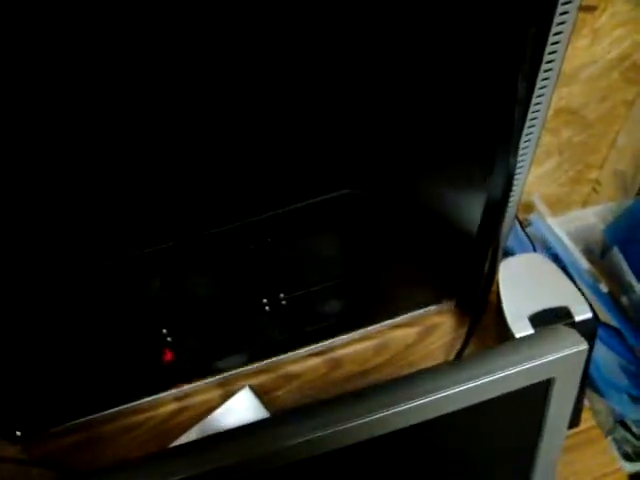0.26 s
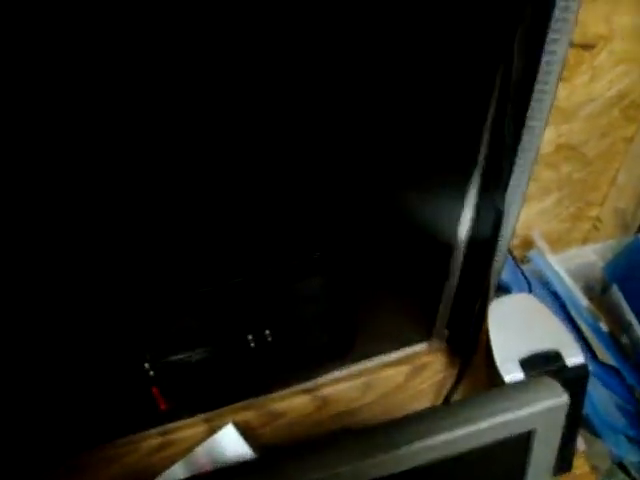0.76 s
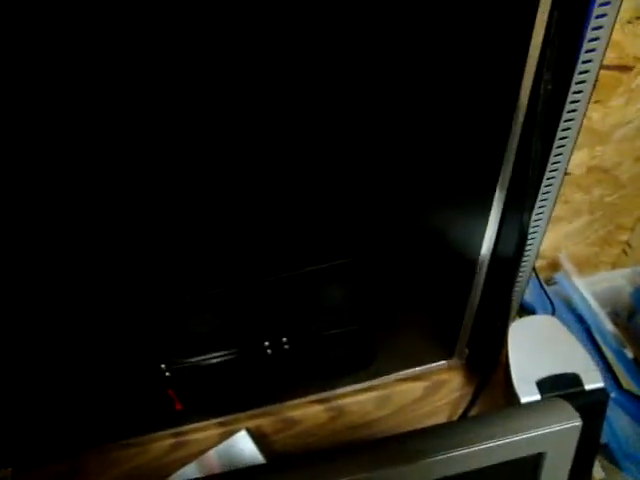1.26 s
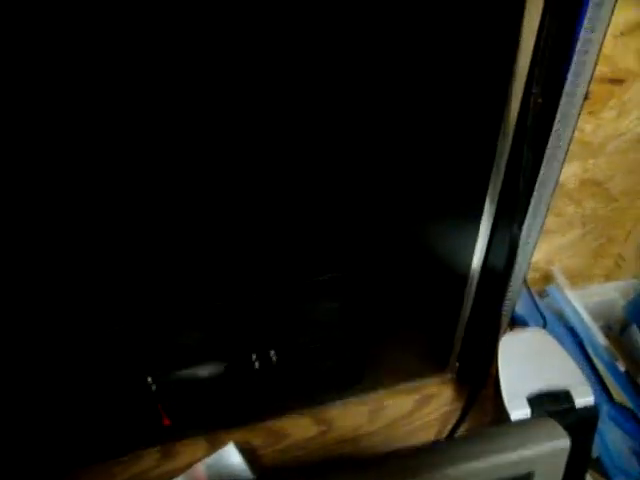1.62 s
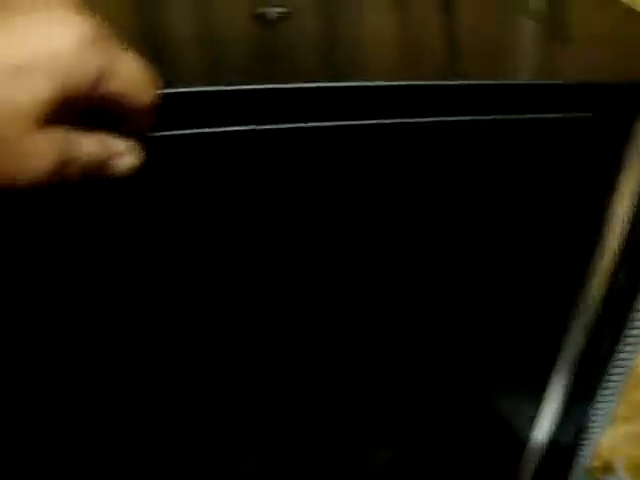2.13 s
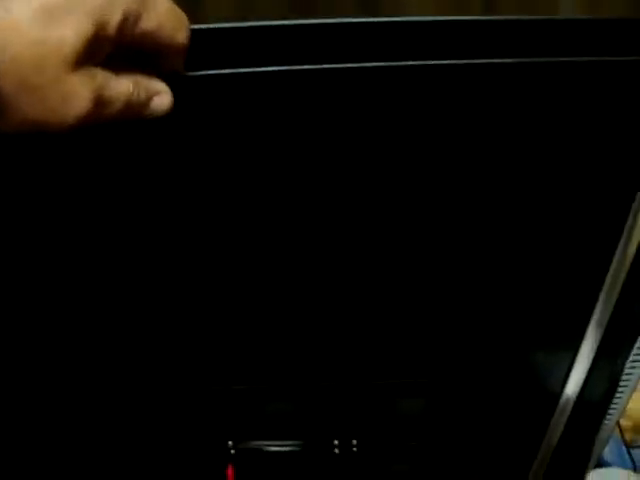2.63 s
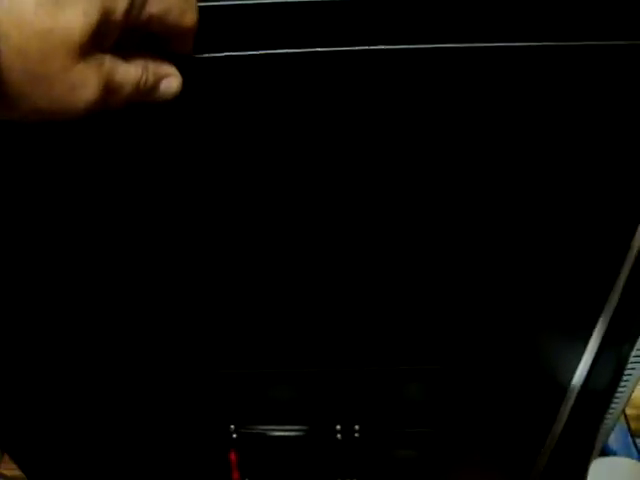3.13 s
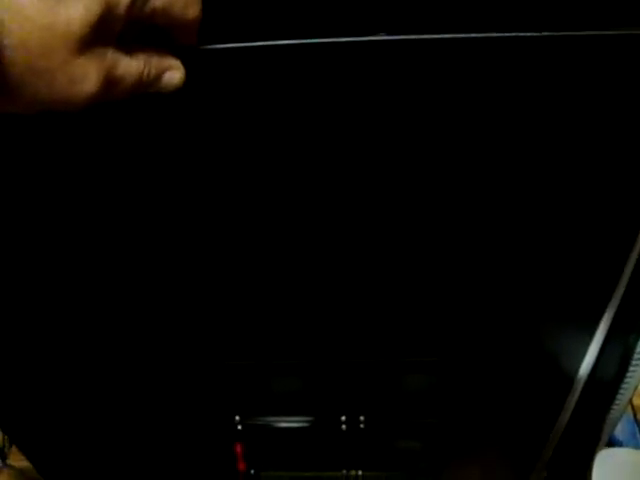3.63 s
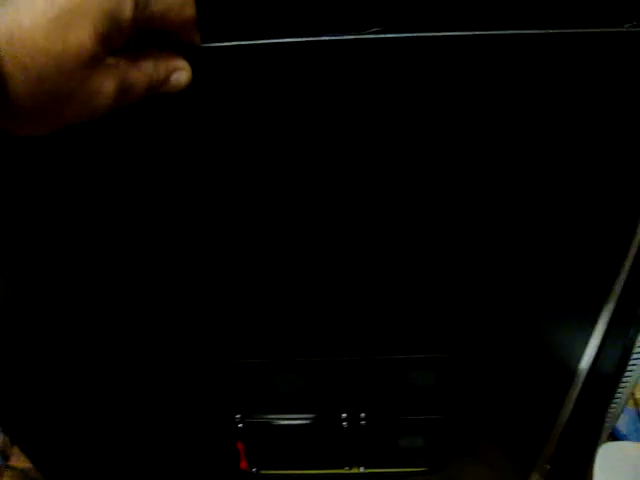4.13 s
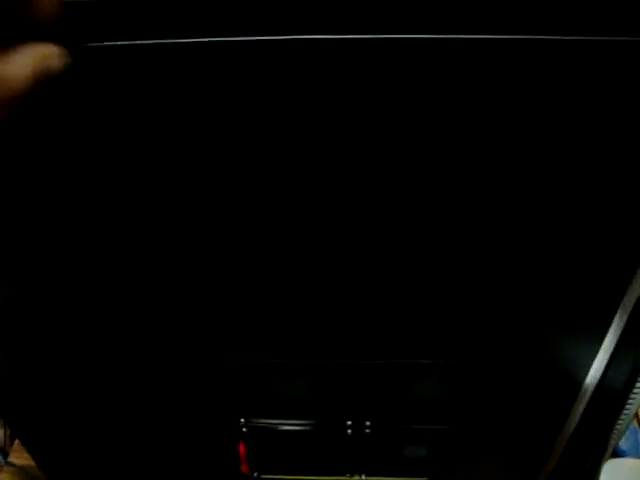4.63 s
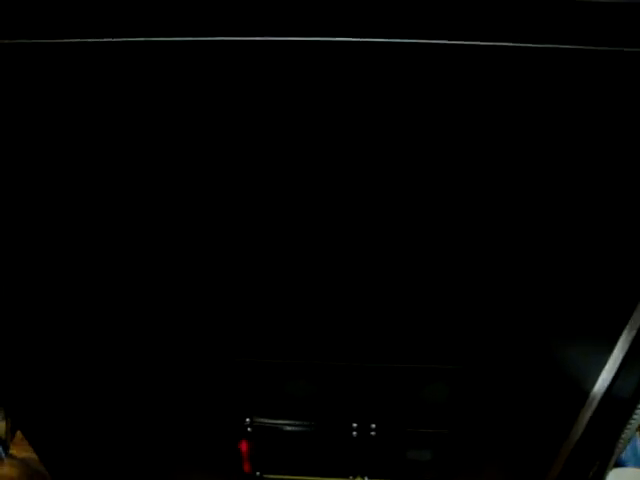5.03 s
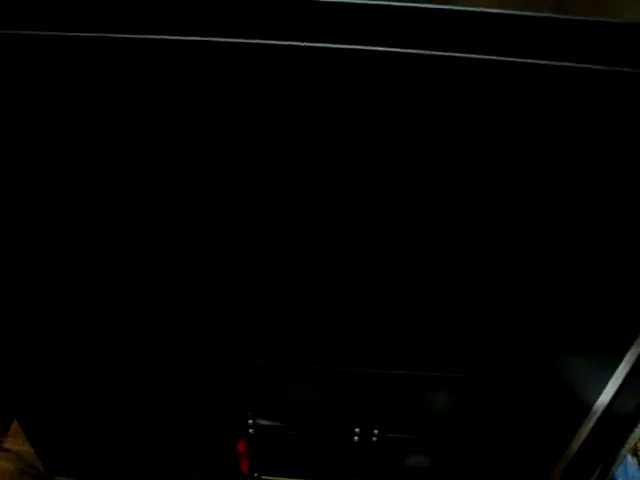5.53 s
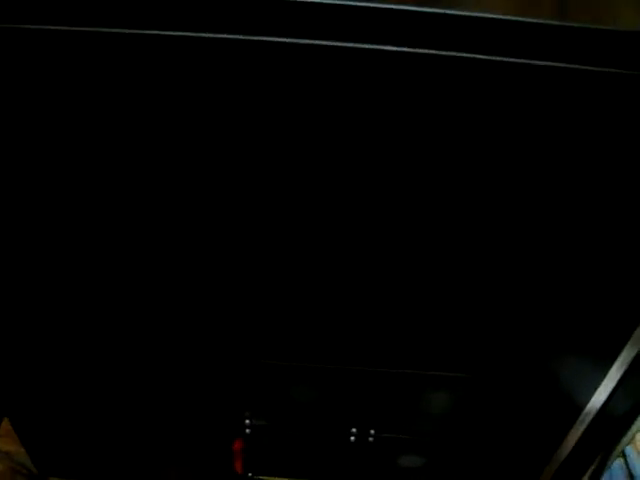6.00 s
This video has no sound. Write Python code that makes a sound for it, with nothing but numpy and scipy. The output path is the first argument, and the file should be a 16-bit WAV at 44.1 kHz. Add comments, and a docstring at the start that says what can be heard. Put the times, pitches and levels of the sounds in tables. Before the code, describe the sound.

Throughout about 6.3 seconds, a desktop computer runs close by: a low, steady pump drone, gently wavering fan tones and a broad rush of air. After a quiet start, a hollow knock and scuff land at 0.7, with lighter taps following. From 1.2 to 1.65 come sharp clacks and small rattling bounces, then a faint scrape at 1.8 and a tap at 2.0. A busy run of scuffs, snaps and clicks fills 2.5 to 3.0. After a pause, a duller, solid knock hits at 3.8, with a softer one at 4.0 and a sliding hiss to 4.4. The loudest crack, at 4.46, breaks into rattles until 4.9. Smaller knocks follow around 5.1; the pump softens and a low panel hum rises. Bright snaps chatter at 5.6 to 5.8, then a hand hisses across the panel to the end. Nearly mono, with flattened peaks.

```python
"""A hand works a case panel into place close by: it knocks, snaps and rattles against the frame. Each contact
sums decaying modes of the panel with shaped noise bursts; edge scuffs and a sliding hand are swelling noise.
Behind them a desktop computer runs: pump harmonics drone, fan tones waver, and noise makes the air rush. The
hardest knocks are flattened; only a faint, late treble differs between left and right."""
import sys
import numpy as np
from scipy import signal
from scipy.fft import rfft, irfft, next_fast_len
from scipy.io import wavfile

SR = 44100
rng = np.random.default_rng(int(sys.argv[2]) if len(sys.argv) > 2 else 0)


def persist_wave(psi):
    """Save psi, clipped to +-1, as 16-bit WAV."""
    counts = np.round(np.clip(psi, -1, 1) * 32767).astype(np.int16)
    wavfile.write(sys.argv[1], SR, np.atleast_2d(counts).T)


N = 276066


def from_db(db):
    """Decibels to gain."""
    return 10 ** (np.asarray(db) / 20)


def rms_one(x):
    """Scale to unit power."""
    return x / np.sqrt(np.mean(x ** 2) + 1e-20)


def noise(spectrum, size=N):
    """Noise of rms 1 with the given colour, silent outside its first and last frequency."""
    hz, db = np.transpose(spectrum)
    padded = next_fast_len(size)
    bins = np.maximum(np.fft.rfftfreq(padded, 1 / SR), 1)
    gain = from_db(np.interp(np.log(bins), np.log(hz), db, left=-90, right=-90))
    white = rng.standard_normal(padded)
    return rms_one(irfft(rfft(white) * gain, padded)[:size])


def drift(rate):
    """Random wander: straight lines between random points of spread 1, rate points a second."""
    knots = rng.standard_normal(2048)
    return np.interp(np.arange(N) / SR * rate, np.arange(len(knots)), knots)


def resonate(x, hz, width_hz):
    """One resonance with gain 1 on top."""
    r = np.exp(-np.pi * width_hz / SR)
    feed = np.array([1, 0, -1]) * (1 - r * r) / 2
    feedback = [1, -2 * r * np.cos(2 * np.pi * hz / SR), r * r]
    return signal.lfilter(feed, feedback, x + 1e-18)


def decay(t, t60):
    """Exponential decay, by 60 dB in t60 seconds."""
    return np.exp(-np.minimum(np.log(1000) * t / max(t60, 1e-3), 40))


def tone(hz, flutter_db):
    """A sine of rms 1 on a pitch curve, before its level flutters at random."""
    phase = 2 * np.pi * (np.cumsum(hz) / SR + rng.random())
    return np.sqrt(2) * np.sin(phase) * from_db(flutter_db * drift(22))


# Air rushing through the grilles close by.
# Each row: frequency in Hz, relative level in dB per Hz.
AIR_COLOUR = [(300, 7.5), (490, -0.5), (590, 2.5), (700, 0.5), (930, 3), (1200, -1), (1800, -1.5),
              (2150, -3), (3200, -4.5), (4600, -7), (5200, -11.5), (7500, -16.5), (10000, -18.5),
              (10800, -63)]
# The same air booming inside the case. Each row: frequency in Hz, relative level in dB per Hz.
CASE_BOOM_COLOUR = [(20, -31), (50, -22.5), (90, -16.5), (140, -15.5), (190, -3.5), (270, 2), (330, -15),
                    (420, -5.5), (480, -17.5), (700, -47)]


def airflow():
    """Air rushes through the grilles, slightly uneven, and booms in the case."""
    turbulence = from_db(0.5 * drift(25))
    rush = from_db(-29.5) * turbulence * noise(AIR_COLOUR)
    boom = from_db(-32.0) * noise(CASE_BOOM_COLOUR)
    return rush + boom


# Fan blade tones in the case.
# Each row: frequency in Hz, level in dB rms before flutter and the panel's shielding.
FAN_BLADE_TONES = [(573, -47), (635, -49), (764.4, -42), (877.5, -52), (1604, -53), (1771, -48.5),
                   (2024, -59), (2573, -48.5)]


def fans():
    """Blade tones whose pitch and level waver in the turbulence."""
    out = np.zeros(N)
    for hz, db in FAN_BLADE_TONES:
        pitch_hz = hz * (1 + 0.00346 * drift(25.04))
        out += from_db(db) * tone(pitch_hz, flutter_db=2.5)
    return out


PUMP_SHAFT_HZ = 59.25
# Cooling pump in the case. Each row: multiple of the shaft speed,
# level in dB rms before flutter, the pump's overall trim and the panel's shielding.
PUMP_HARMONICS = [(2, -49.5), (3, -51.5), (4, -33), (5, -31.5), (6, -36), (7, -43.5)]


def pump():
    """Harmonics of one almost steady shaft."""
    shaft_hz = PUMP_SHAFT_HZ * (1 + 0.0021 * drift(5.6))
    return sum(from_db(db) * tone(k * shaft_hz, flutter_db=1.1) for k, db in PUMP_HARMONICS)


# How firmly the panel sits in its frame. Each row: time in seconds, seating from 0 loose to 1 seated.
SEATING_CURVE = [(0, 0.11), (1.0, 0.1), (2.3, 0.15), (3.3, 0.03), (4.3, 0.19), (4.9, 0.44), (5.35, .95),
                 (6.26, 1)]


def seating(s):
    """How firmly the panel sits at the given times, 0-1."""
    return np.clip(np.interp(s, *np.transpose(SEATING_CURVE)), 0, 1)


def panel_hum(seated):
    """The panel hums along with the machine, the more firmly it is seated."""
    pitch_hz = 220.4 * (1 + 0.003 * drift(10))
    return seated * from_db(-29.5) * tone(pitch_hz, flutter_db=1.0)


PUMP_TRIM_DB = -0.97
PUMP_SHIELD_DB, AIR_SHIELD_DB = 4.5, 0.5   # loss behind a fully seated panel


def machine():
    """Pump, fans and air, shielded by the panel as it seats, with the panel's hum."""
    seated = seating(np.arange(N) / SR)
    drone = from_db(PUMP_TRIM_DB - PUMP_SHIELD_DB * seated) * pump()
    blowing = from_db(-AIR_SHIELD_DB * seated) * (airflow() + fans())
    return drone + blowing + panel_hum(seated)


# Skin on the smooth panel. Each row: frequency in Hz, relative level in dB per Hz.
SKIN_COLOUR = [(3000, -23), (5500, 0), (7500, 1.5), (9000, 7), (10000, 9.5), (11000, -44)]
# The hand slides over the panel.
# Each row: start in seconds, end in seconds, hiss in dB at full speed before flicker.
HAND_SLIDES = [(3.593, 3.738, -38.5), (4.094, 4.41, -30.5), (5.847, 6.258, -28)]
SLIDE_SWELL_DB, SLIDE_STOP_T60_S = 13, 0.087   # each stroke gathers speed, then stops


def sliding_hand():
    """Skin hisses on the smooth panel, louder as each stroke gathers speed."""
    t, level = np.arange(N) / SR, np.zeros(N)
    for start, end, db in HAND_SLIDES:
        speed = np.clip((t - start) / (end - start), 0, 1)
        swell = (t > start) * from_db(db - SLIDE_SWELL_DB * (1 - speed))
        level += swell * decay(np.maximum(t - end, 0), SLIDE_STOP_T60_S)
    flicker = from_db(3 * drift(60))
    return level * flicker * noise(SKIN_COLOUR)


# Panel edge grating on the frame. Each row: frequency in Hz, relative level in dB per Hz.
SCUFF_COLOUR = [(150, -18), (400, 14), (900, 5.5), (1800, 2.5), (3100, -0.5), (4400, 0), (6000, -3.5),
                (10000, -8.5)]
# The edge scuffs along the frame. Each row: middle in seconds, level in dB before a common 3 dB cut,
# half length in seconds, pitch of the rubbed spot in Hz.
EDGE_SCUFFS = [(0.683, -18, 0.003, 1910), (0.749, -26, 0.0073, 3300), (1.46, -40, 0.0095, 406),
               (1.56, -33.5, 0.012, 400), (1.805, -30.5, 0.062, 2750), (2.535, -25.5, 0.017, 1920),
               (2.58, -23.5, 0.01, 686), (2.708, -20.5, 0.01, 2930), (2.8, -18.5, 0.025, 410),
               (2.888, -26.5, 0.026, 696), (4.344, -22, 0.014, 3100), (4.492, -10, 0.0068, 1050),
               (4.6, -29, 0.042, 1050), (4.75, -27.5, 0.052, 1010), (5.03, -15, 0.0054, 840),
               (5.508, -26, 0.032, 2980), (5.65, -17.5, 0.013, 526), (5.678, -19.5, 0.054, 2020),
               (5.813, -25.5, 0.023, 2930)]


def scuffs():
    """The edge rubs in short strokes of flickering noise; each excites the spot that it rubs."""
    t, out = np.arange(N) / SR, np.zeros(N)
    grating = noise(SCUFF_COLOUR) * from_db(3 * drift(300))
    for s, db, half_s, hz in EDGE_SCUFFS:
        stroke = from_db(db - 3.0) * np.exp(-((t - s) / half_s) ** 2 / 2)
        spot = rms_one(resonate(grating, hz, width_hz=0.15 * hz))
        out += stroke * (grating + from_db(-1.0) * spot)
    return out


# Bending modes of the panel. Each row: frequency in Hz before a random shift,
# level in dB before a common 5 dB cut and a random change, t60 in seconds.
PANEL_MODES = [(86.6, -26.5, 0.35), (153.1, -10.5, 0.26), (185, -11, 0.23), (229.6, 0.5, 0.15),
               (275.3, 3, 0.34), (301, -7.5, 0.097), (364.5, -2, 0.2), (390, -11, 0.27), (429.1, -4, 0.34),
               (510, -23, 0.17), (588, -9, 0.076), (751, -15.5, 0.34)]
# The desk's slow, deep shudder. Each row: frequency in Hz, relative level in dB per Hz.
DESK_COLOUR = [(25, -19), (50, -12), (85, -3), (150, 5), (220, -26)]


def thump(t):
    """The whole panel flexes, every blow weighting its modes differently, and shakes the desk."""
    flexing = np.zeros(len(t))
    for hz, db, t60 in PANEL_MODES:
        strength = from_db(db - 5 + rng.normal(0, 2.46)) * rng.choice([-1, 1])
        mode_hz = hz * (1 + rng.normal(0, 0.021))
        flexing += strength * decay(t, t60) * np.sin(2 * np.pi * mode_hz * t)
    desk = from_db(-26.5) * noise(DESK_COLOUR, size=len(t)) * decay(t, 0.69)
    onset = 1 - decay(t, 0.028)
    return (flexing + desk) * onset


def burst(t, t60, hold_s, room_db, room_t60):
    """Envelope: edges chatter for a few milliseconds and ring out; case and room add a longer tail."""
    onset = 1 - decay(t, 0.00092)
    direct = decay(np.maximum(t - hold_s, 0), t60)
    tail = from_db(room_db) * decay(t, room_t60)
    return onset * np.hypot(direct, tail)


def soften(x, hardness_db, corner_hz, db_per_octave):
    """A softer contact leaves the high modes unstruck; corner_hz holds at a hardness of 0 dB."""
    hz = np.clip(corner_hz * 2 ** (hardness_db / db_per_octave), 2000, 0.4 * SR)
    return rms_one(signal.sosfilt(signal.butter(4, hz, fs=SR, output="sos"), x))


def rattle(t, gap_s, depth_db):
    """The panel bounces unevenly, so that a contact dies away in small surges."""
    times = np.cumsum(rng.uniform(0.57, 2.6, 256)) * gap_s
    surges = np.interp(t, times, rng.standard_normal(256))
    share = 0.5 - decay(t, 0.056)   # from -0.5 through zero to half the depth
    return from_db(depth_db * surges * share)


# The panel's dense upper modes. Each row: frequency in Hz, relative level in dB per Hz.
CLACK_COLOUR = [(800, -8), (1350, -6.5), (1800, 0), (2200, -3), (2600, 0), (3200, -1.5), (4000, -4),
                (5500, -9), (9000, -35)]
# The panel's edges snapping. Each row: frequency in Hz, relative level in dB per Hz.
SNAP_COLOUR = [(1500, -35), (3000, 9.5), (4700, 5), (6300, 11), (7500, 6.5), (8700, 11.5), (10000, 10.5),
               (12000, -73)]
# The hollow case. Each row: frequency in Hz, relative level in dB per Hz.
BODY_COLOUR = [(280, -16.5), (390, 6.5), (490, -5), (640, -0.5), (720, -1), (850, 0.5), (1080, -4),
               (1400, -6), (2000, -37)]
BODY_DB = -2.5   # the hollow case, relative to a knock's strength, at a weight of 0 dB
BODY_FOLLOWS_WEIGHT = 0.23   # share of a knock's weight that also goes into the hollow case
LOOSE_T60_S, SEATED_T60_S = 0.057, 0.064   # the clack's decay; the other bursts scale with it


def contact(s, db, weight_db, hardness_db, spot_hz, ring_db):
    """One contact: a low thump, a hollow body, a clack, a ring at the struck spot, a bright snap."""
    size = SR // 2
    t = np.arange(size) / SR
    t60 = LOOSE_T60_S + (SEATED_T60_S - LOOSE_T60_S) * seating(s)

    cluster_hz = 550 + 0.028 * spot_hz   # width of each resonance at the struck spot
    spot = resonate(rng.standard_normal(size), spot_hz, cluster_hz)
    spot = rms_one(resonate(spot, spot_hz, cluster_hz))
    ring = from_db(ring_db) * spot * burst(t, 0.3 * t60, hold_s=0.0091, room_db=-30, room_t60=0.099)

    plate = soften(noise(CLACK_COLOUR, size=size), hardness_db, corner_hz=6000, db_per_octave=14.0)
    clack = plate * burst(t, t60, hold_s=0.0047, room_db=-6.5, room_t60=0.23)

    hollow = from_db(BODY_DB + BODY_FOLLOWS_WEIGHT * weight_db) * noise(BODY_COLOUR, size=size)
    body = hollow * burst(t, 2.4 * t60, hold_s=0.0043, room_db=-7.5, room_t60=0.31)

    edges = from_db(hardness_db) * noise(SNAP_COLOUR, size=size)
    snap = edges * burst(t, 0.14 * t60, hold_s=0.14 * t60, room_db=-34, room_t60=0.1)

    chatter = (ring + clack + body + snap) * rattle(t, gap_s=0.0035, depth_db=11.5)
    return from_db(db) * (chatter + from_db(weight_db) * thump(t))


# The panel bounces on after a hard knock. Each row: start in seconds, gap between bounces in seconds,
# first strength in dB, loss per bounce in dB; gaps and strengths vary at random.
BOUNCE_RUNS = [(1.211, 0.024, -24, 5.5), (1.552, 0.025, -32.5, 4), (4.578, .023, -24, 1.1),
               (5.663, 0.02, -17.5, 1.04)]
BOUNCE_WEIGHT_DB, BOUNCE_HARDNESS_DB, BOUNCE_RING_DB = 6, 3.5, -1   # the same for all bounces
BOUNCE_JITTER, BOUNCE_SPREAD_DB = 0.25, 1   # most change of timing (share of a gap) and of strength
BOUNCE_SPOT_HZ = (2150, 6070)   # range of the spots that they strike


def bounces(count):
    """Each run is uneven, generally weakening contacts at random spots, in rows like the knocks."""
    rows = []
    for start, gap_s, first_db, loss_db in BOUNCE_RUNS:
        for k, (late, louder, place) in enumerate(rng.uniform(-1, 1, (count, 3))):
            s = start + gap_s * (k + BOUNCE_JITTER * late)
            db = first_db - loss_db * k + BOUNCE_SPREAD_DB * louder
            spot_hz = np.interp(place, [-1, 1], BOUNCE_SPOT_HZ)
            rows.append((s, db, BOUNCE_WEIGHT_DB, BOUNCE_HARDNESS_DB, spot_hz, BOUNCE_RING_DB))
    return rows


# The panel hits the frame, close by. Each row: start in seconds, strength in dB,
# weight as extra thump in dB, hardness as extra snap in dB, pitch of the struck spot in Hz,
# its ring in dB relative to the strength.
PANEL_KNOCKS = [(0.677, -17, 10, -3, 1900, 3), (0.771, -31.5, 11.5, 3, 5260, 2),
                (0.819, -25.5, 9, -3, 5270, 0), (1.182, -14.5, -4, 7.5, 5400, -11),
                (1.383, -15, 1, -2.5, 5440, 3), (1.408, -19.5, 11.5, -1.5, 5350, -4),
                (1.487, -28.5, -1, -0.5, 3570, -2), (1.533, -18, 12, -5, 6240, 0.5),
                (1.634, -28, 10.5, -1, 4150, 4.5), (2.005, -27, 5.5, -0.5, 3160, -5),
                (2.667, -22, 6, 5.5, 6000, -23), (2.748, -19, 4, -7, 6040, -1),
                (2.763, -10.5, -4, 3, 7200, 1.5), (2.847, -18.5, -6, 10.5, 670, 7.5),
                (2.872, -17, 2.5, -4, 750, -7), (2.89, -24, 2, 10, 7100, -10),
                (2.922, -22.5, 0, 7, 7190, -16), (2.978, -27.5, 8.5, 8, 7150, -10),
                (3.816, -11, -1.5, -15, 1810, 8.5), (4.032, -21, 5, -8, 1620, 0.5),
                (4.459, -5.5, -2.5, 0, 4480, -1), (4.477, -17, 10, -12, 1010, 1),
                (4.494, -13, 1.5, 1, 1090, -12), (4.53, -9.5, -4, -1, 2090, -12),
                (4.548, -16, 6.5, 1.5, 1100, -10), (4.647, -18, -3, -3, 4350, -7),
                (4.714, -22, -3, -3, 4170, -3), (4.853, -26.5, -17, -1, 4200, -5),
                (5.018, -23.5, 15, -2, 840, -0.5), (5.061, -18.5, -12, -1.5, 1130, -3),
                (5.094, -14.5, -1.5, -3, 1900, -7), (5.169, -32, 10, 6, 7040, 1),
                (5.594, -15.5, 9.5, 1.5, 3050, 8), (5.626, -12.5, 2, 5, 7400, -10),
                (5.651, -12, -5, 5.5, 7240, 0), (5.76, -28.5, 4, 9, 3250, 2),
                (5.952, -25.5, 9, -2.5, 1090, -4)]
# Stiff modes that every contact brings out. Each row: frequency in Hz, width in Hz, gain in dB.
FRAME_MODES = [(621, 6.8, 7.5), (715, 5.7, -14), (1005, 84, -7.5), (1094, 16, -2), (1416, 17, 3),
               (2035, 42, 2), (2205, 66, -0.5), (2640, 9.3, -7), (2760, 35, -9), (4360, 38, -6),
               (4870, 390, -12)]


def knocks():
    """Knocks and their bounces, all ringing through the stiff modes of the frame."""
    struck = np.zeros(N + SR)
    for s, *blow in PANEL_KNOCKS + bounces(count=6):
        sound, at = contact(s, *blow), int(s * SR)
        struck[at:at + len(sound)] += sound
    frame = sum(from_db(db) * resonate(struck, hz, width) for hz, width, db in FRAME_MODES)
    return (struck + frame)[:N]


def faint_side(mid, lag_s, side_db):
    """Nearly mono: only a faint, late copy of the treble differs between left and right."""
    late = np.interp(np.arange(N) - lag_s * SR, np.arange(N), mid, left=0)
    band = signal.butter(2, [1900, 9000], "band", fs=SR, output="sos")
    side = from_db(side_db) * signal.sosfilt(band, late)
    return np.array([mid + side, mid - side])


def scene():
    """The running machine, and the hand at work on its panel."""
    hand_at_work = sliding_hand() + scuffs() + knocks()
    return faint_side(machine() + hand_at_work, lag_s=0.0045, side_db=-26)


def record(dry):
    """The input stage flattens the loudest peaks; the top is cut."""
    clipped = 0.95 * dry / (1 + np.abs(dry) ** 8) ** (1 / 8)
    top_cut = signal.cheby2(16, 70, 11300, fs=SR, output="sos")   # 70 dB down from 11300 Hz up
    return signal.sosfilt(top_cut, clipped)


dry = scene()
out = record(dry)
persist_wave(out)
```